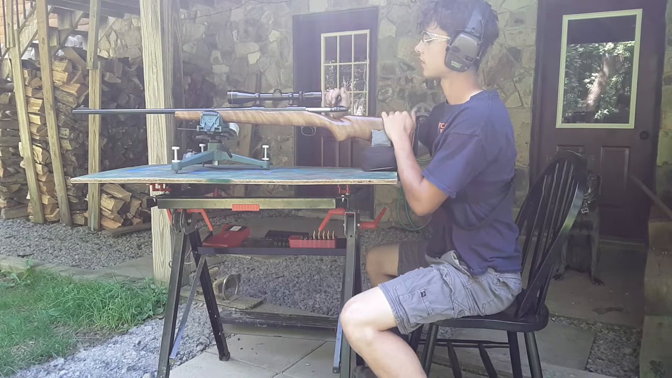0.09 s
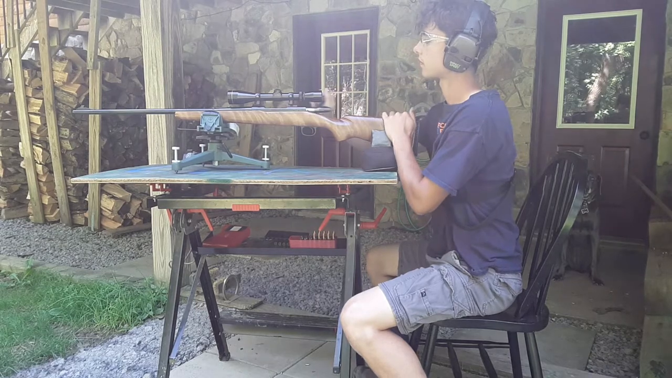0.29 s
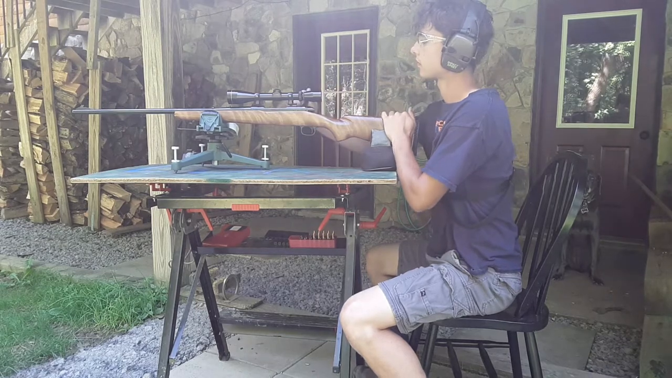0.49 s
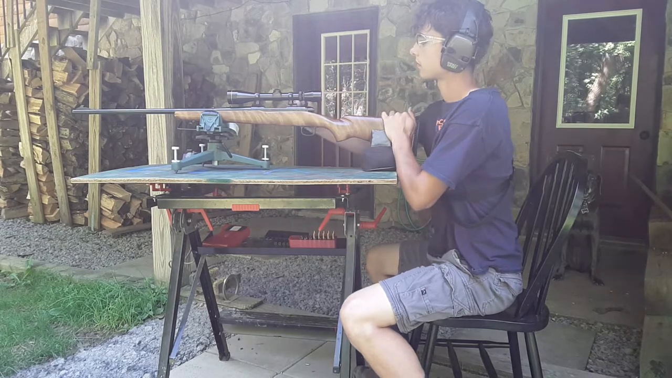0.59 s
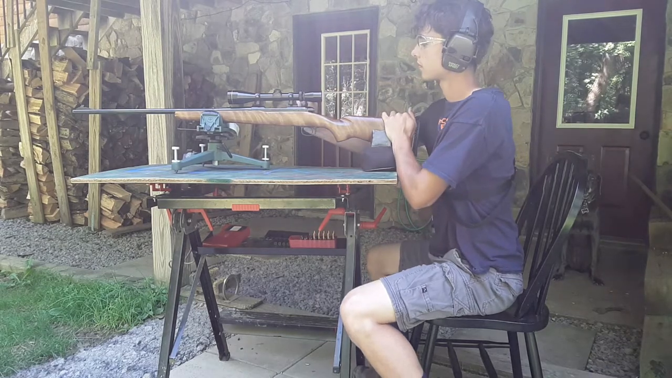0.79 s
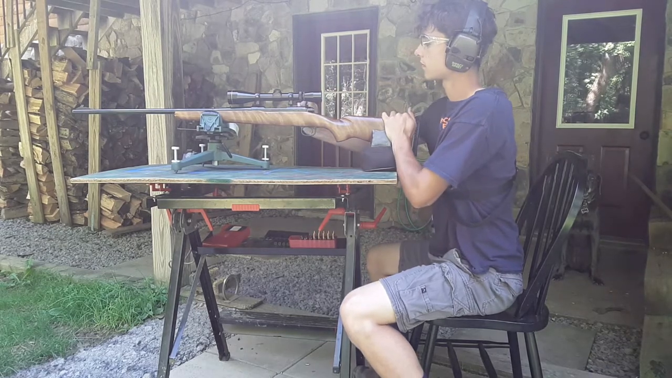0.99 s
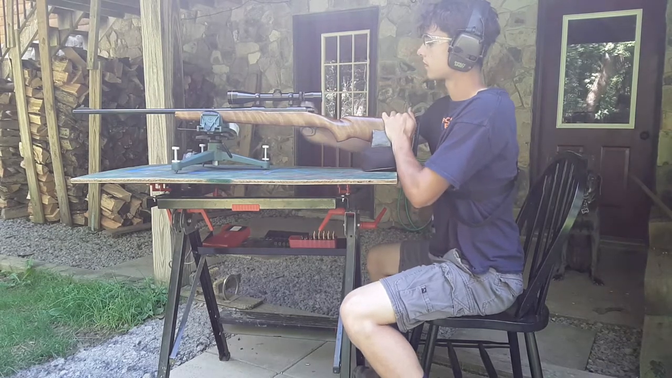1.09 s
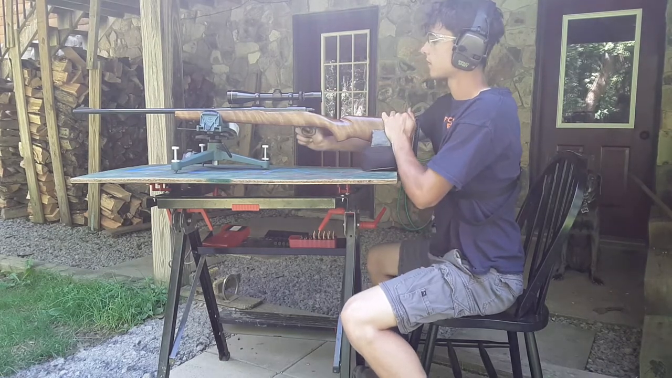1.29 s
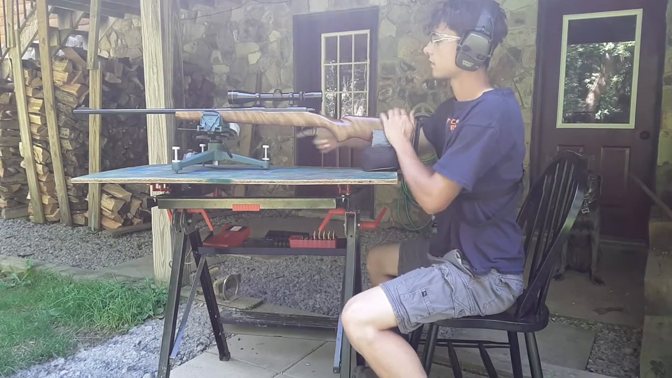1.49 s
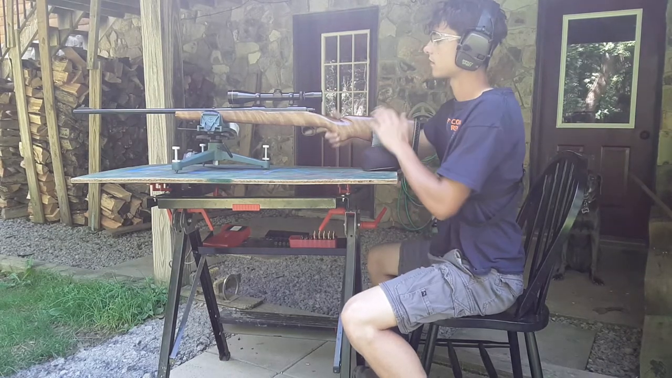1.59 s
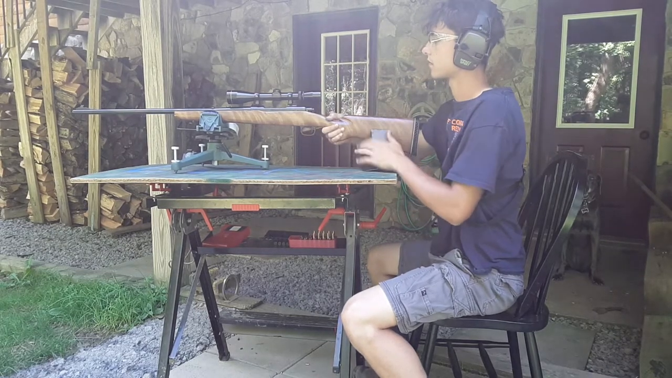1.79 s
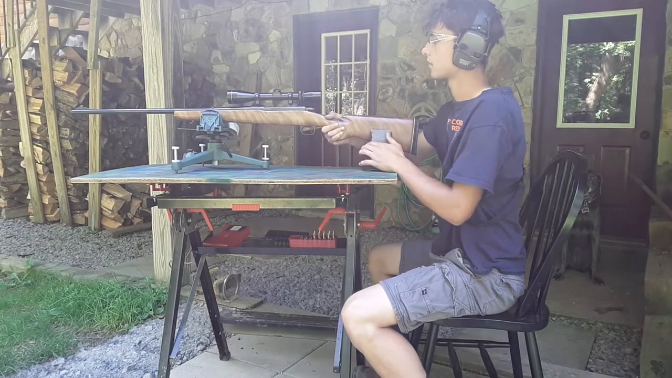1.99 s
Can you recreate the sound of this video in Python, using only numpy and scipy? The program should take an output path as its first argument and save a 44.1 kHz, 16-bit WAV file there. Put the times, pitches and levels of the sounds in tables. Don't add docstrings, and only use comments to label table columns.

```python
import sys
import numpy as np
from scipy import signal
from scipy.fft import rfft, irfft
from scipy.io import wavfile
from scipy.ndimage import uniform_filter1d

SR = 44100
rng = np.random.default_rng(int(sys.argv[2]) if len(sys.argv) > 2 else 0)


def invert_db(level):
    return 10 ** (np.asarray(level, dtype=float) / 20)


def persist_wave(psi):
    counts = np.round(np.clip(psi, -1, 1) * 32767).astype(np.int16)
    wavfile.write(sys.argv[1], SR, np.atleast_2d(counts).T)


N = 88200

# start_s, peak_db, rise_ms, crack_t60_s, ringing_db
KNOCKS = [
    (0.2134, -12, 0.93, 0.018, -5.5),
    (0.2657, -19.5, 1.4, 0.066, -10),
    (0.4489, -8.5, 3.78, 0.018, -5.5),
    (1.1485, -5.5, 0.5, 0.0053, -9.5),
]
# frequency_hz, level_db (per Hz)
DRAWN_COLOUR = [(180, -81.5), (300, -35), (1810, -12.5), (4020, -9.5), (6740, 2.5), (11100, -23.5),
                (12700, -16), (14200, -28), (16000, -60)]
STOP_COLOUR = [(180, -37), (300, -9.5), (1900, -7), (4440, -0.5), (6740, 7.5), (8360, -1), (9390, -13),
               (14500, -14), (16000, -64)]
HOME_COLOUR = [(200, -29), (600, -24.5), (850, -12), (1000, -11), (1800, -12.5), (3800, -11.5),
               (5000, -9.5), (6800, -4), (7600, -9.5), (16000, -29.5)]
LATCH_COLOUR = [(150, -27), (480, -18.5), (680, -6), (1000, -20.5), (1250, -8), (1500, -15), (1800, -4.5),
                (2600, -27.5), (3100, -11.5), (6770, -7), (16000, -25.5)]
# pitch_hz, level_db, t60_s
BOLT_MODES = [(5260, -1, 0.043), (5520, 12, 0.03), (6820, -10, 0.026), (7700, -13, 0.019), (8130, -7, 0.04),
              (9800, 12, .03), (11000, 14, 0.03), (13700, 2, .035)]
RECEIVER_MODES = [(930, 0.5, 0.018), (1800, -19, 0.061), (2670, -25, 0.033), (3826, 0, 0.056),
                  (5260, 0, .04), (6500, -9, 0.031), (6890, 11.5, 0.03)]
MAGAZINE_MODES = [(686, -7, 0.06), (801, -2, 0.029), (1278, -7, 0.026), (1814, -2.5, 0.017),
                  (3080, 10.5, 0.026), (4260, -1, 0.031), (6920, 12, 0.036), (8470, 1.5, 0.06),
                  (10260, 5, 0.058)]
# start_s, peak_db, centre_hz, width_octaves, t60_s
TICKS = [(0.091, -33.5, 4330, 0.72, 0.018), (0.0966, -26, 6560, 6.5, 0.0046), (.141, -60, 3500, 1.9, 0.032),
         (0.1787, -20.5, 4600, 3.6, 0.027), (0.181, -27, 5600, 1.8, 0.017),
         (0.1836, -22.5, 5240, 1.3, 0.0082), (0.2, -29, 4800, 1.1, 0.048), (0.382, -30.5, 3600, 1.9, 0.057),
         (0.39, -26.5, 1800, 4.8, 0.1), (0.401, -28.5, 1850, 2.7, 0.016), (0.4328, -18, 6540, 0.91, 0.0094),
         (0.4347, -17, 5460, 0.62, 0.011), (0.4396, -24, 6560, 0.65, 0.026),
         (0.4424, -19.5, 3020, 1.84, 0.012), (0.4459, -26.5, 4400, 2.6, 0.0061),
         (0.595, -37.5, 1380, 0.29, 0.016), (0.598, -36, 1900, 0.18, 0.03),
         (0.5948, -27.5, 3900, 0.95, 0.025), (0.786, -42.5, 4520, 0.16, 0.05),
         (1.0688, -22, 7900, 1.04, 0.013), (1.0998, -22.5, 6640, 1.4, 0.011),
         (1.103, -35, 7040, 0.34, 0.013), (1.1126, -27, 2900, 1.94, 0.02), (1.115, -32, 6500, 0.93, 0.02),
         (1.1598, -22, 6600, 0.7, .015), (1.171, -21.5, 1600, 1.6, 0.025), (1.178, -21, 8000, 1.4, .012),
         (0.2322, -21, 7000, 1.2, 0.024), (0.272, -20, 5500, 0.52, 0.026), (0.476, -16.5, 5500, 1.4, 0.016),
         (1.795, -50, 3000, 2, 0.0088), (1.454, -38.5, 2400, 0.48, 0.017), (1.556, -38, 11000, 0.37, 0.026),
         (1.57, -47, 13000, 0.37, .03), (1.6425, -35.5, 3200, 1.7, 0.026)]
# start_s, length_s, level_db, centre_hz
SLIDES = [(0.097, 0.047, -45, 2740), (0.182, 0.025, -66, 4000), (0.254, 0.02, -38, 4900),
          (0.277, 0.076, -39.5, 2720), (0.37, 0.064, -43, 3470), (0.463, 0.252, -51.5, 2840),
          (1.05, 0.034, -58, 4530), (1.244, 0.24, -55.5, 3040)]
# start_s, length_s, level_db, pitch_hz, width_hz
SQUEAKS = [(.13, .05, -52, 3550, 200), (.388, .035, -55, 10500, 300), (.39, .03, -59, 11900, 300),
           (.35, .03, -56, 3600, 250)]
# frequency_hz, level_db
TICK_AND_SLIDE_COLOUR = [(400, -4), (1200, -6.5), (5000, -5.5), (6800, -2.5), (8500, -11), (12000, -15.5),
                         (16000, -57)]
# start_s, length_s, level_db, pitch_hz, width_hz
THUDS = [(.1, .09, -48, 145, 70), (.1, .06, -56, 240, 60), (.2, .1, -55, 210, 120),
         (.45, .06, -55, 190, 120), (1.15, .05, -53, 175, 70), (.6, .06, -61, 120, 70),
         (1.38, .05, -60, 85, 40), (1.6, .2, -64, 75, 40)]
# frequency_hz, level_db
DIRECT_COLOUR = [(7000, 4), (9000, 0), (16000, 7.5)]
# frequency_hz, balance_db
DIRECT_BALANCE = [(300, 0.5), (1300, 1), (2200, 8), (5000, 7), (9000, 14), (14000, 7)]
# frequency_hz, t60_s
PORCH_T60 = [(300, 0.17), (1500, 0.16), (6000, 0.11), (14000, 0.12)]
# time_s, level_db
AIR_LEVEL = [(0.0, -54.5), (0.22, -52.5), (2.0, -60.5)]
# frequency_hz, level_db (per Hz)
HISS_SPECTRUM = [(300, -8), (500, -10.5), (1000, -15.5), (2000, -7), (5000, -6), (6700, -3.5),
                 (8300, -13.5), (16400, -34.5)]
RUMBLE_SPECTRUM = [(12, -42), (20, -5.5), (70, 7), (145, -0.5), (344, -22), (375, -3.5), (600, -60),
                   (780, -52), (1320, -120)]
# frequency_hz, likeness (0-1)
AIR_LIKENESS = [(60, 0.1), (240, 0.96), (950, 0), (3770, 0), (15000, 0.1)]
# frequency_hz, balance_db
AIR_BALANCE = [(60, -1.5), (240, 3), (950, 3.5), (3770, 1.5), (15000, 14.5)]
# start_s, length_s, level_db, pitch_hz
DRONE = [(.66, .46, -67, 378), (0, .1, -70, 386)]

OPPOSED = np.array([[1], [-1]])


def at_hz(points, hz):
    p = np.array(points, float)
    return np.interp(np.log(np.maximum(hz, 1)), np.log(np.maximum(p[:, 0], 1)), p[:, 1])


def rms_one(x):
    return x / np.sqrt(np.mean(x ** 2) + 1e-20)


def colour(x, db_of_hz, size=4096):
    cepstrum = irfft(np.log(invert_db(db_of_hz(np.fft.rfftfreq(size, 1 / SR) + 1))))
    cepstrum[1:size // 2] *= 2
    cepstrum[size // 2 + 1:] = 0
    impulse = irfft(np.exp(rfft(cepstrum)))
    return signal.fftconvolve(x, impulse)[:len(x)]


def hump(hz, octaves):
    return lambda f: -np.minimum(6 * (np.log2(f / hz) / octaves) ** 2, 45)


def resonate(x, hz, width_hz):
    r = np.exp(-np.pi * width_hz / SR)
    return signal.lfilter([1 - r], [1, -2 * r * np.cos(2 * np.pi * hz / SR), r * r], x)


def swell(start_s, length_s, edge_s):
    t = np.arange(N) / SR - start_s
    rise = np.clip(t / edge_s, 0, 1)
    sag = np.exp(-np.clip(t, 0, None) / length_s)
    release = np.clip((length_s - t) / (1.9 * edge_s) + 1, 0, 1)
    return rise * sag * release


def resonant_noise(rows, edge_s):
    noise = rng.standard_normal(N)
    out = np.zeros(N)
    for start_s, length_s, level_db, hz, width_hz in rows:
        band = resonate(resonate(noise, hz, width_hz), hz, width_hz)
        out += invert_db(level_db) * swell(start_s, length_s, edge_s) * rms_one(band)
    return out


def crack(rise_ms, t60_s):
    t = np.arange(SR // 4) / SR
    rise = np.clip(t * 1000 / rise_ms, 0, 1) ** 2
    x = rng.standard_normal(len(t)) * rise * invert_db(-60 * t / t60_s)
    hz = np.fft.rfftfreq(len(x), 1 / SR)
    power = uniform_filter1d(np.abs(rfft(x)) ** 2, size=100)
    return colour(x, lambda f: -10 * np.log10(np.interp(f, hz, power)))


def add(out, sound, start_s, peak_db):
    i = int(start_s * SR)
    out[i:i + len(sound)] += (sound * invert_db(peak_db) / np.abs(sound).max())[:len(out) - i]


def steel_modes(modes, t):
    cluster = 1 + 0.025 * np.array([-1, 0.15, 0.7])
    longest_t60_s = 0.045
    steel = np.zeros(len(t))
    for hz, level_db, t60_s in modes:
        partials = np.sin(2 * np.pi * hz * np.outer(cluster, t)).sum(axis=0)
        steel += invert_db(level_db - 60 * t / min(t60_s, longest_t60_s)) * partials
    return steel


def knocks():
    out = np.zeros(N)
    colours = [DRAWN_COLOUR, STOP_COLOUR, HOME_COLOUR, LATCH_COLOUR]
    parts = [BOLT_MODES, BOLT_MODES[3:5], RECEIVER_MODES, MAGAZINE_MODES]
    for (start_s, peak_db, rise_ms, t60_s, ring_db), tone, modes in zip(KNOCKS, colours, parts):
        hit = crack(rise_ms, t60_s)
        t = np.arange(len(hit)) / SR
        rings = signal.fftconvolve(hit, steel_modes(modes, t))[:len(t)]
        rings = colour(rings, lambda f: at_hz(tone, f) / 2)
        body = colour(hit, lambda f: at_hz(tone, f))
        knock = body / np.abs(body).max() + invert_db(ring_db) * rings / np.abs(rings).max()
        add(out, knock, start_s, peak_db)
    return signal.sosfilt(signal.butter(3, 560, "high", fs=SR, output="sos"), out)


def ticks():
    out = np.zeros(N)
    ring_db, ring_width_hz = -10, 300
    for start_s, peak_db, hz, octaves, t60_s in TICKS:
        hit = colour(crack(0.81, t60_s), hump(hz, octaves))
        ring = resonate(hit, hz, ring_width_hz)
        add(out, rms_one(hit) + invert_db(ring_db) * rms_one(ring), start_s, peak_db)
    return colour(out, lambda f: at_hz(TICK_AND_SLIDE_COLOUR, f))


def slides():
    grit_per_s, spread_db, octaves, edge_s = 1800, 1.5, 1.66, 0.0027
    present = rng.random(N) < grit_per_s / SR
    strength = invert_db(spread_db * np.minimum(rng.exponential(1, N), 4))
    grit = present * strength * rng.choice([-1, 1], N)
    out = np.zeros(N)
    for start_s, length_s, level_db, hz in SLIDES:
        rub = rms_one(colour(grit, hump(hz, octaves)))
        out += invert_db(level_db) * swell(start_s, length_s, edge_s) * rub
    return colour(out, lambda f: at_hz(TICK_AND_SLIDE_COLOUR, f))


def squeaks():
    return resonant_noise(SQUEAKS, 0.0025)


def bench_thuds():
    return resonant_noise(THUDS, 0.002) + invert_db(-3.5) * resonant_noise(THUDS, 0.012) * OPPOSED


def direct(near):
    near = colour(near, lambda f: at_hz(DIRECT_COLOUR, f))
    left = colour(near, lambda f: at_hz(DIRECT_BALANCE, f) / 2)
    right = colour(near, lambda f: -at_hz(DIRECT_BALANCE, f) / 2)
    lag_samples = 2
    right = np.interp(np.arange(N) - lag_samples, np.arange(N), right)
    return np.array([left, right])


def evened(x):
    power, hz = np.abs(rfft(x)) ** 2, np.fft.rfftfreq(len(x), 1 / SR)
    bumps = uniform_filter1d(power, size=40) / uniform_filter1d(power, size=600)
    return colour(x, lambda f: -10 * np.log10(np.interp(f, hz, bumps)))


def porch(x):
    onset_s, wall_s, wall_width_s, wall_db = 0.007, 0.027, 0.019, 3
    far_t60_s, far_db = 0.98, -29
    alike_hz = 1010
    grain_db, grain_s = 2.0, 0.0015
    level_db, left_db = -0.5, 1
    t = np.arange(SR // 2) / SR
    wall_echo = invert_db(wall_db * np.exp(-((t - wall_s) / wall_width_s) ** 2))
    shape = np.clip(t / onset_s, 0, 1) * wall_echo
    edges, tail = 100 * 2 ** np.arange(0, 7.6, 0.5), 0
    for low, high in zip(edges, edges[1:]):
        band_pass = signal.butter(2, [low, high], "band", fs=SR, output="sos")
        mid, side = signal.sosfilt(band_pass, rng.standard_normal((2, len(t))))
        alike = 1 / (1 + (low / alike_hz) ** 4)
        pair = np.sqrt(1 + alike) * mid + np.sqrt(1 - alike) * side * OPPOSED
        near_decay = invert_db(-60 * t / at_hz(PORCH_T60, np.sqrt(low * high)))
        far_decay = invert_db(far_db - 60 * t / far_t60_s)
        tail = tail + pair * (near_decay + far_decay)
    grain = rms_one(uniform_filter1d(rng.standard_normal(len(t)), size=int(grain_s * SR)))
    tail = np.array([evened(side) for side in tail * shape * invert_db(grain_db * grain)])
    tail = tail / np.sqrt(np.mean(np.sum(tail ** 2, axis=1)))
    answer = signal.fftconvolve(x[None], tail, axes=1)[:, :N]
    return invert_db(level_db) * invert_db(left_db * OPPOSED) * answer


def outdoor(spectrum):
    hz = np.fft.rfftfreq(N, 1 / SR)
    mid, side = rfft(rng.standard_normal((2, N))) * invert_db(at_hz(spectrum, hz))
    alike = np.clip(at_hz(AIR_LIKENESS, hz), 0, 1)
    lean_db = at_hz(AIR_BALANCE, hz) / 2
    pair = np.sqrt(1 + alike) * mid + np.sqrt(1 - alike) * side * OPPOSED
    pair = irfft(pair * invert_db(lean_db * OPPOSED), N)
    return pair / np.sqrt(np.mean(pair.mean(axis=0) ** 2))


def air():
    time_s, level_db = np.transpose(AIR_LEVEL)
    hiss_db = np.interp(np.arange(N) / SR, time_s, level_db)
    rumble_db = -68 + hiss_db - hiss_db[-1]
    return invert_db(hiss_db) * outdoor(HISS_SPECTRUM) + invert_db(rumble_db) * outdoor(RUMBLE_SPECTRUM)


def drone():
    t = np.arange(N) / SR
    out = np.zeros(N)
    for start_s, length_s, level_db, hz in DRONE:
        fade = np.clip(np.minimum(t - start_s, start_s + length_s - t) / 0.031 + 0.5, 0, 1)
        out += invert_db(level_db) * fade * np.sin(2 * np.pi * hz * t)
    return out


def scene():
    hard = knocks() + slides() + squeaks()
    light = ticks()
    stirred = hard + invert_db(-2) * light
    return direct(hard + light) + bench_thuds() + porch(stirred) + air() + drone()


def low_pass(x):
    return signal.sosfilt(signal.butter(12, 16530, fs=SR, output="sos"), x)


def record(dry):
    x = signal.sosfilt(signal.cheby2(12, 60, 16300, fs=SR, output="sos"), dry)
    mix = np.clip(x, -1, 1)
    return low_pass(mix)


dry = scene()
out = record(dry)
persist_wave(out)
```